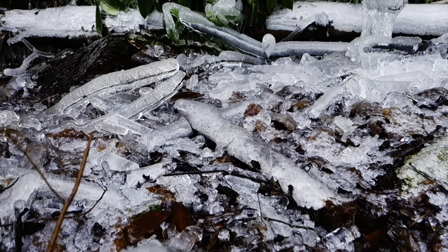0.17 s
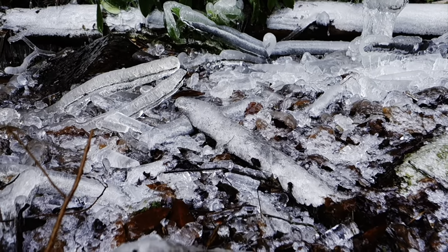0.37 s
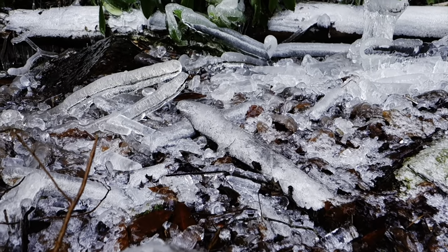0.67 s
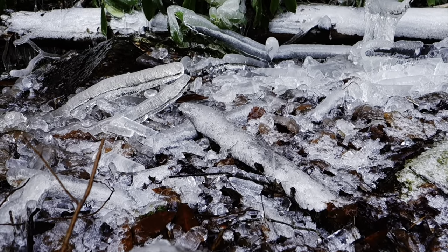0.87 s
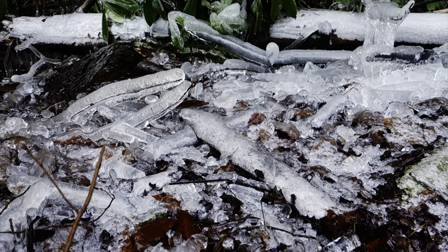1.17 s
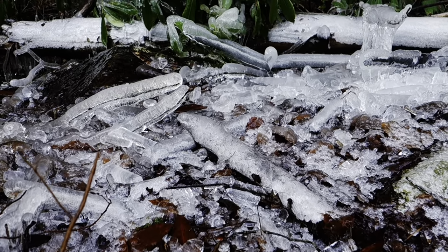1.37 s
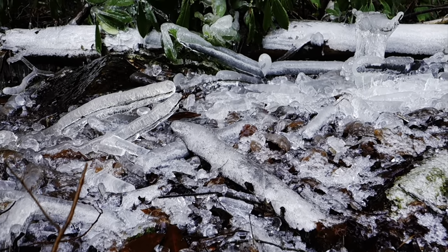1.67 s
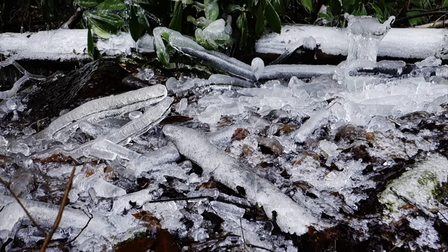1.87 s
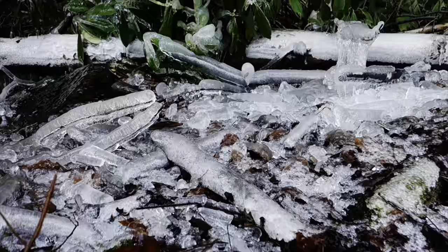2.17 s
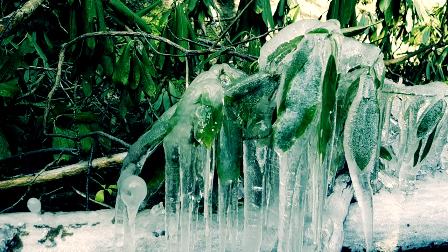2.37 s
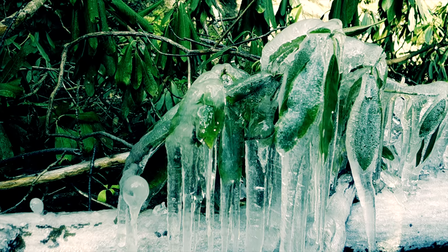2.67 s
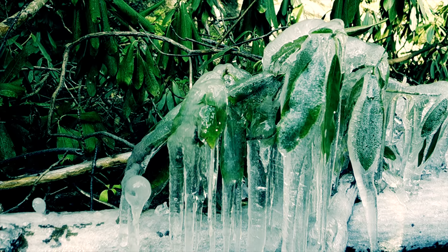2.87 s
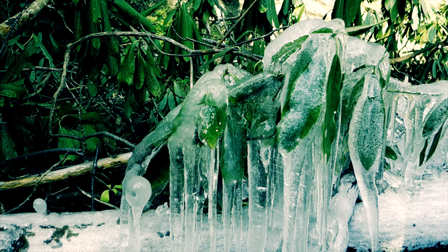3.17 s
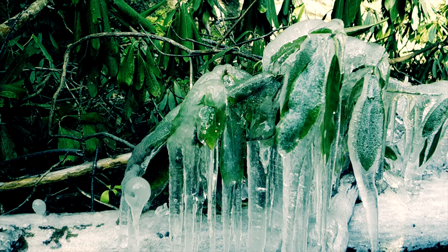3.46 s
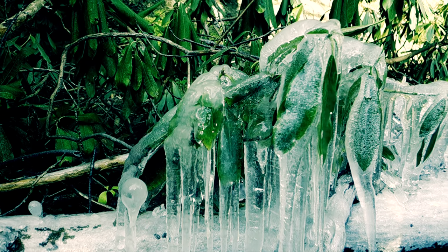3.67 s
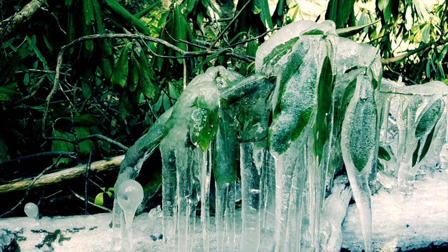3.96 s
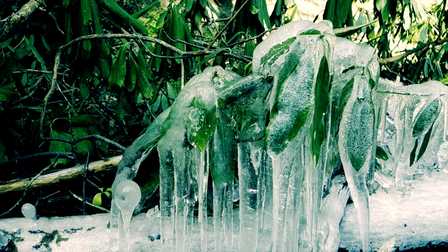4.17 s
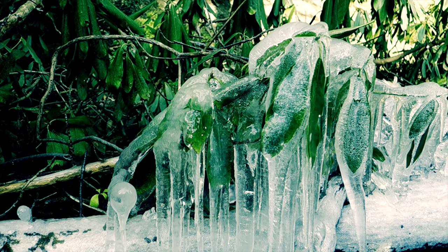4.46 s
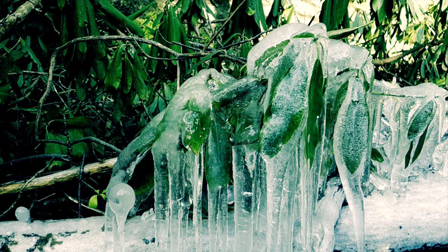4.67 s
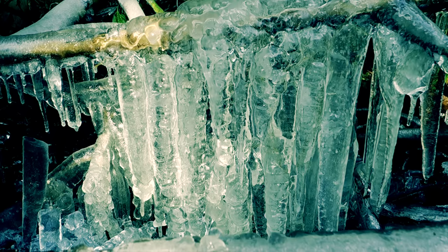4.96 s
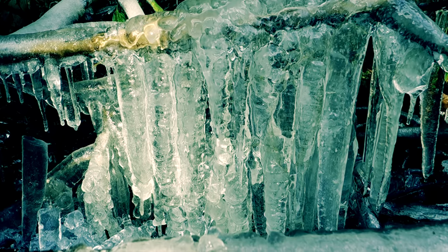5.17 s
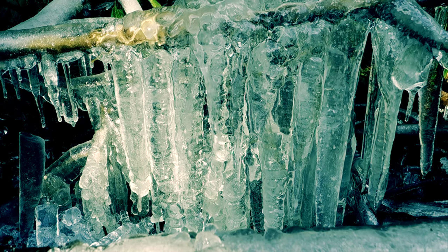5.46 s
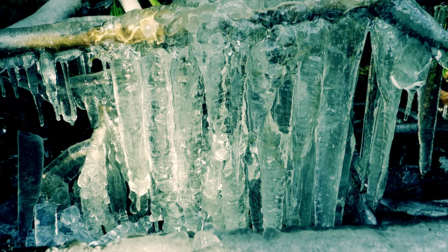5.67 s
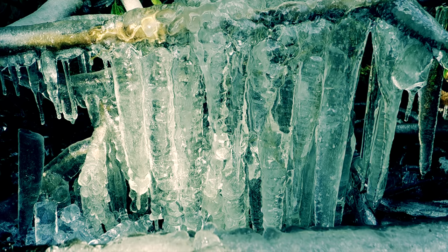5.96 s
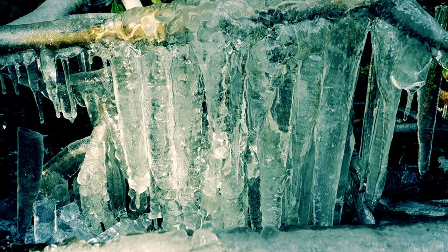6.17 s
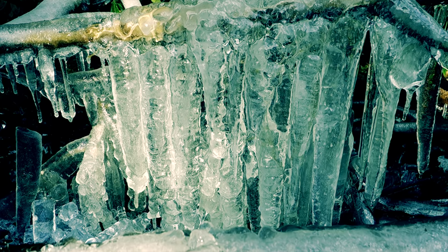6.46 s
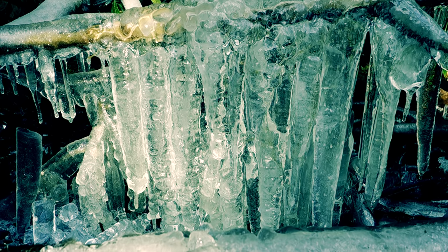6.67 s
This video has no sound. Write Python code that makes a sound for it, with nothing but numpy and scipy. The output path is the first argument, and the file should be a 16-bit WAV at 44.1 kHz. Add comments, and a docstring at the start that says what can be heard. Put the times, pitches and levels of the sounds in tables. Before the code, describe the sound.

Close, crisp water drops tick, plink and spatter at random outdoors, with a small stream rushing quietly behind and surging for about a second.

```python
"""Meltwater drips from icicles onto ice, wet rock and leaves beside a small stream.
Each near drop clicks, rings for a few cycles as damped sines and throws a spray that patters down just after it;
lighter drops fall at random and single bubbles chirp upwards.
Coloured noise and swarms of damped sines form farther drops and the rush of the stream,
which swells for just over a second near the end and then loses much of its low babble."""
import sys
import numpy as np
from scipy import signal
from scipy.fft import rfft, irfft, next_fast_len
from scipy.io import wavfile
from scipy.ndimage import uniform_filter1d, map_coordinates

SR = 44100
rng = np.random.default_rng(int(sys.argv[2]) if len(sys.argv) > 2 else 0)


def generate_wav(signal):
    """Clip the signal to [-1, 1] and save it as 16-bit WAV at the path in sys.argv[1]."""
    frames = np.transpose(np.atleast_2d(signal))
    scaled = np.clip(frames, -1, 1) * 32767
    pcm = np.round(scaled).astype(np.int16)
    wavfile.write(sys.argv[1], SR, pcm)


N = 301203  # length in samples

# Near drops. Each row: start in seconds, ring pitch in Hz, relative ring level in dB,
# relative click level in dB, relative spray level in dB, left over right in dB (ring and click).
DROPS = [(.0582, 8040, -36.5, -47, -63, 5), (.1587, 9080, -39.5, -46, -63, 3),
         (.2535, 6550, -50, -46, -58, 4), (.2657, 3260, -33, -41, -46, -4), (.2671, 2700, -36, -42, -40, 3),
         (.4168, 3150, -41, -35, -53, 2), (.4625, 9180, -43, -44, -50, 2), (.5233, 4530, -36, -39, -51, 1),
         (.528, 6000, -43, -52, -52, 2), (.554, 2200, -39.5, -50, -56, -2),
         (.8222, 4460, -40, -52, -60, -4), (.9073, 6030, -43, -36.5, -42, -1),
         (.9287, 3700, -46, -40, -56, -4), (.9562, 5500, -45, -38, -47, 2),
         (1.0007, 2520, -30, -47, -52, -3), (1.1803, 9100, -41, -37, -54, 4),
         (1.2013, 2550, -40, -48, -47, 0), (1.2228, 7700, -52, -36, -44, 2),
         (1.2497, 9600, -41, -36.5, -42, 4), (1.2618, 4570, -36, -34, -54, 1),
         (1.4174, 2550, -35, -34.5, -45, 1), (1.5173, 9350, -48, -41, -58, 7),
         (1.5238, 2960, -37, -52, -65, -4), (1.6395, 6550, -35, -47, -57, 0),
         (1.7175, 6200, -40, -35, -40.5, 5), (1.7441, 3300, -36, -37, -47, -4),
         (1.7462, 3500, -40, -31, -45, 2), (1.7798, 2700, -32, -33.5, -41, -1),
         (1.799, 2450, -36, -43, -59, -3), (1.8114, 2630, -33.5, -45, -58, -6),
         (1.853, 3930, -42, -52, -66, -5), (1.9278, 4150, -39, -30, -41, 1),
         (1.9531, 8760, -44, -41, -50, -2), (1.9749, 2040, -38, -36.5, -58, -1),
         (2.0119, 2370, -34, -42, -49, -3), (2.033, 4300, -44, -32.5, -56, 0),
         (2.0969, 2250, -32, -49, -50, -2), (2.1292, 3700, -48, -40, -65, -6),
         (2.3701, 8790, -42, -43, -59, 12), (2.3763, 3670, -44, -43, -65, -3),
         (2.4237, 9900, -36, -54, -61, 4), (2.4512, 2670, -41, -50, -58, -5),
         (2.4985, 3180, -43, -45, -54, -8), (2.5086, 2140, -38.5, -42, -41.5, -2),
         (2.7198, 3350, -36, -38, -47, -4), (2.7794, 4560, -35, -43, -41, -8),
         (2.8065, 3330, -42, -43, -56, 0), (2.8138, 2540, -40, -35, -45, -4),
         (2.8366, 2380, -36, -46, -50, -1), (3.0108, 3200, -32, -36, -54, 2),
         (3.0306, 2500, -37, -56, -54, -2), (3.044, 3970, -36, -42, -38, 0),
         (3.1003, 4840, -38, -44, -47, -13), (3.2404, 2420, -44, -54, -57, -6),
         (3.321, 3790, -40, -41, -54, -3), (3.3466, 9500, -36, -46, -42, 3),
         (3.378, 2870, -40, -37.5, -50, -4), (3.5221, 6660, -26.5, -29.5, -41, 1),
         (3.5474, 5700, -42, -37, -38, -4), (3.7105, 3970, -43, -39, -50, 0),
         (3.8377, 4240, -43, -39, -41, 4), (3.9723, 2650, -30.5, -31, -46, 2),
         (4.0008, 3770, -25, -33.5, -35.5, -9), (4.0507, 2480, -34.5, -46, -61, -6),
         (4.0962, 3300, -35.5, -43, -39, -3), (4.1585, 8900, -39, -40, -46, 3),
         (4.1996, 5900, -35, -38, -42, -1), (4.2306, 8100, -53, -35, -40, -3),
         (4.2965, 4590, -40, -50, -48, 0), (4.3932, 3000, -37, -35.5, -39, -2),
         (4.6325, 2660, -37, -55, -56, -7), (4.6983, 4990, -44, -51, -41, -9),
         (4.8081, 8750, -38, -38, -51, -2), (4.9525, 3760, -35.5, -45, -50, 0),
         (4.966, 2580, -36, -36, -46, -2), (5.057, 3480, -32, -37, -36, -1),
         (5.0665, 5540, -33, -48, -51, 0), (5.0964, 2940, -32, -48, -52, -5),
         (5.1549, 2200, -35, -44, -38, 4), (5.2099, 3280, -21, -29, -44, 0),
         (5.2114, 3400, -22, -30, -36, -4), (5.2266, 4870, -30, -31, -32, 1),
         (5.252, 2920, -38, -33, -42, 0), (5.2555, 2900, -33, -32, -49, 0),
         (5.262, 2500, -29.5, -41, -42, -1), (5.2675, 5830, -34, -41, -48, -6),
         (5.4415, 3380, -35, -44, -46, 2), (5.4482, 3170, -33, -44, -50, 1),
         (5.628, 7200, -34, -33.5, -40, 5), (5.9841, 4990, -36, -36, -46, 0),
         (6.0533, 2240, -27.5, -41, -47, 0), (6.0915, 4730, -34, -31, -39, -4),
         (6.266, 3980, -60, -35, -58, 0), (6.3862, 3200, -38, -53, -55, 2),
         (6.581, 2110, -39, -37.5, -50, 1), (6.6575, 3100, -46, -40, -60, -4),
         (6.7365, 4360, -43, -42, -54, 0)]
# Filter shapes of the stream's layers. Each row: frequency in Hz, relative gain in dB.
BABBLE_SPECTRUM = [(30, -60), (140, -30), (200, -20), (280, -9), (400, -2), (600, 1.5), (850, 2.5),
                   (1250, 6.5), (1800, -3), (4000, -54)]
RUSH_SPECTRUM = [(150, -71), (400, -15.5), (700, -9.5), (1100, -3.5), (1700, -1), (2500, 0), (3300, -1),
                 (4500, -3), (7000, -8), (11000, -11.5)]
PATTER_SPECTRUM = [(500, -54), (2000, -2), (3500, -5.5), (5000, -2.5), (7500, -1), (11000, 1.5)]
# Coherence of the stream noise. Each row: frequency in Hz, left-right correlation (1 is identical).
COHERENCE = [(100, 0.95), (300, 0.92), (600, 1), (1200, 0.9), (2500, 0.94), (5000, 0.032), (11000, 0.43)]
# Echo of the rocky bank. Each row: frequency in Hz, time to decay by 60 dB in seconds.
BANK_DECAY = [(300, 0.2), (2500, 0.12), (10000, 0.039)]
# Modes of a wet hollow. Each row: multiple of its pitch, relative level in dB, share of the ring's life.
HOLLOW_MODES = [(1, 17, 0.55), (.68, -2, 1), (1.4, -10, 0.48), (1.95, -10, 0.93)]
# Far patter before swell and random drift. Each row: time in seconds, level in dB.
PATTER_LEVEL = [(0, -42), (1.05, -44.5), (1.7, -41), (2.3, -42), (2.95, -44.5), (3.9, -41.5), (4.35, -39),
                (4.8, -42.5), (5.7, -41.5), (6.83, -43)]
# Low babble before swell, final fade and random surges. Each row: time in seconds, level in dB.
BABBLE_LEVEL = [(0, -56), (.6, -54.5), (1.1, -57), (2.2, -55), (2.6, -52.5), (3.2, -56), (3.75, -55.5),
                (4.4, -53.5), (6.83, -55.5)]
# Single bubbles. Each row: start in seconds, level in dB, starting pitch in Hz,
# time to the peak in seconds, climb of the pitch in Hz per second.
BUBBLES = [(.059, -40, 2130, .002, 20000), (.595, -50, 560, 0.0063, 2800), (.635, -38, 2600, 0.0017, 20000),
           (.861, -42, 2370, .002, 20000), (.989, -37.5, 1620, 0.0039, 15000),
           (1.0961, -28, 1100, 0.0011, 280000), (1.283, -43, 1037, 0.01, 6000),
           (1.47, -39, 2460, .002, 20000), (1.541, -39, 2020, .002, 20000),
           (1.5904, -26, 890, 0.0018, 380000), (1.956, -44, 1330, .002, 15000),
           (2.116, -41, 2270, .003, 15000), (2.529, -39, 2350, 0.0018, 20000),
           (2.731, -41.5, 1690, 0.0054, 7000), (2.851, -40, 2030, 0.0022, 20000),
           (3.531, -38, 2060, .001, 50000), (3.729, -51, 323, 0.0033, 1600),
           (3.936, -40.5, 1340, 0.0025, 12000), (4.1715, -39, 740, 0.0024, 35000),
           (5.68, -38, 2360, .003, 15000), (6.052, -46, 250, 0.0018, 70000),
           (6.261, -37, 1650, 0.0036, 12000), (6.518, -42, 1810, 0.0022, 15000),
           (6.59, -38, 2640, 0.0022, 20000)]

TOP_HZ = 11090  # upper band limit
RING_CYCLES = 3  # decay of a drop's ring to 1/e, before the time to flatten is added
HARD_CLICK_DB = -28.5  # a click this loud snaps fully
# lighter drops: typical values on the scales of DROPS, and their scatter
LIGHT_HZ, LIGHT_OCTAVES = 2850, 0.31
LIGHT_RING_DB, LIGHT_CLICK_DB, LIGHT_SPRAY_DB = -56, -48.5, -59
LIGHT_SPREAD_DB, LIGHT_PAN_DB = 3.5, 4
# the swell of the stream rises, holds and falls back
SWELL_START_S, SWELL_RISE_S = 4.87, 0.094
SWELL_END_S, SWELL_FALL_S = 6.175, 0.055
BABBLE_FADE_S = 0.12  # the low babble dies away more slowly than the rush
# changes of level during the swell and after it, and the level of the rush before it
BABBLE_SWELL_DB, BABBLE_AFTER_DB = 2, -12.5
RUSH_DB, RUSH_SWELL_DB, RUSH_AFTER_DB = -46.5, 8, 2.5
PATTER_SWELL_DB = 6.5


def amp(db):
    """Level: decibels to an amplitude ratio."""
    return 10 ** (np.asarray(db) / 20)


def unit(x):
    """Normalisation: scale to rms 1."""
    return x / np.sqrt(np.mean(x ** 2) + 1e-20)


def along(points, hz):
    """Interpolation: (Hz, value) points read on a logarithmic frequency axis."""
    f, value = np.transpose(points)
    return np.interp(np.log(hz + 1), np.log(f + 1), value)


def curve(points):
    """Interpolation: (seconds, value) points read at every sample."""
    s, value = np.transpose(points)
    return np.interp(np.arange(N) / SR, s, value)


def ramp(start_s, length_s):
    """Linear transition from 0 to 1 over length_s."""
    return np.clip((np.arange(N) / SR - start_s) / length_s, 0, 1)


def wobble(rate):
    """Slow random fluctuation: a smooth curve through rate random knots a second."""
    knots = rng.standard_normal(int(N * rate / SR) + 4)
    return map_coordinates(knots, [np.arange(N) * rate / SR])


def filtered(x, response):
    """Linear filtering: the spectrum of x times a response of frequency."""
    m = next_fast_len(N + SR // 2)
    return irfft(rfft(x, m) * response(np.fft.rfftfreq(m, 1 / SR)), m)[..., :N]


def coloured(x, spectrum):
    """Spectral shaping: x through a gain curve, rms 1."""
    return unit(filtered(x, lambda hz: amp(along(spectrum, hz))))


def add(track, s, sound):
    """Superposition: mix a stereo sound into the track at time s."""
    part = track[:, max(round(s * SR), 0):][:, :sound.shape[1]]
    part += sound[:, :part.shape[1]]


def noise(patchy_db):
    """Turbulence: white noise with patches of random gain, partly coherent between the two sides."""
    z = signal.stft(rng.standard_normal((2, N)), nperseg=256)[2]
    field = rng.standard_normal(z.shape[1:])
    field = uniform_filter1d(field, size=5, axis=0)  # across frequency
    field = uniform_filter1d(field, size=9, axis=1)  # across time
    pair = signal.istft(z * amp(patchy_db * unit(field)), nperseg=256)[1][:, :N]

    def mid_side_gains(hz):
        angle = np.arccos(np.clip(along(COHERENCE, hz), -1, 1)) / 2
        return np.array([np.cos(angle), np.sin(angle)])

    mid, side = filtered(pair, mid_side_gains)
    return unit(np.array([mid + side, mid - side]))


def grains(s, hz, gain, cycles, lag_ms, glide, size):
    """Damped oscillation: one decaying sine per droplet or bubble, each with its own lag and level by side."""
    hz = np.clip(hz, 100, TOP_HZ)[:, None]
    lag, pan = rng.standard_normal((len(s), 2)).T
    index = (s * SR).astype(int)[:, None] + np.arange(size)
    sides = []
    for sign in (1, -1):
        delay = lag_ms / 1000 * (2 + sign * lag[:, None] / 2)
        turns = hz * np.maximum(np.arange(size) / SR - delay, 0)
        age = turns / cycles
        envelope = np.exp(-age) * (1 - np.exp(-2 * turns))
        wave = np.sin(2 * np.pi * turns * (1 + glide * age)) * envelope
        level = (gain * amp(sign * 3.34 * pan))[:, None]
        sides.append(np.bincount(index.ravel(), (wave * level).ravel(), N)[:N])
    return np.array(sides)


def swarm(centre_hz, octaves, spread_db, cycles, lag_ms, glide, count, size):
    """Random superposition: grains at random times, pitches and strengths, rms 1."""
    when = rng.random(count)
    pitch, strength = rng.standard_normal((count, 2)).T
    hz = centre_hz * 2 ** (octaves * pitch)
    gain = amp(spread_db * np.minimum(strength, 2)) * (hz < TOP_HZ) * np.sqrt(hz)
    return unit(grains(when * N / SR, hz, gain, cycles, lag_ms, glide, size))


def flow(surge_db=1.66, ripple_db=0.2, drift_db=0.83):
    """Flow strength: levels in dB of babble, rush and patter; one swell lifts all three and each wanders."""
    over = ramp(SWELL_END_S, SWELL_FALL_S)
    swell = ramp(SWELL_START_S, SWELL_RISE_S) - over
    babble = curve(BABBLE_LEVEL) + BABBLE_SWELL_DB * swell
    babble += BABBLE_AFTER_DB * ramp(SWELL_END_S, BABBLE_FADE_S)
    rush = RUSH_DB + RUSH_SWELL_DB * swell + RUSH_AFTER_DB * over
    patter = curve(PATTER_LEVEL) + PATTER_SWELL_DB * swell
    return babble + surge_db * wobble(6.9), rush + ripple_db * wobble(18), patter + drift_db * wobble(10.0)


def stream(flutter_db=2.5):
    """Bubble resonance and turbulence: rising-pitched bubbles in a noisy rush, under the patter of far drops."""
    babble_db, rush_db, patter_db = flow()
    big = swarm(centre_hz=652.8, octaves=0.63, spread_db=1, cycles=8.8, lag_ms=0.12,
                glide=0.013, count=1200, size=2000)
    small = swarm(centre_hz=2013.0, octaves=0.6994, spread_db=1.5, cycles=10.8, lag_ms=0.084,
                  glide=0.018, count=4500, size=1000)
    plinks = swarm(centre_hz=3740, octaves=0.49, spread_db=1.5, cycles=9.5, lag_ms=0.06,
                   glide=0.01, count=500, size=1500)
    ticks = swarm(centre_hz=5980, octaves=0.86, spread_db=8, cycles=0.97, lag_ms=0.041,
                  glide=0, count=5000, size=120)
    babble = coloured(noise(patchy_db=0.1) + amp(-13.5) * big, BABBLE_SPECTRUM)
    babble = babble * amp([[1], [-1]])  # 1 dB up on the left, 1 dB down on the right
    rush = coloured(noise(patchy_db=0.8) + amp(-10) * small, RUSH_SPECTRUM)
    rush = unit(rush + amp(-10.5) * plinks)
    patter = coloured(noise(patchy_db=2.5) + amp(-10.0) * ticks, PATTER_SPECTRUM)
    # far drops come in flurries, unlike on the two sides
    flurries = flutter_db * np.array([wobble(22), wobble(22)])
    return amp(babble_db) * babble + amp(rush_db) * rush + amp(patter_db + flurries) * patter


def bank(x):
    """Diffuse reflection: rock, ice and leaves scatter a short echo, modelled as decaying noise."""
    hz, t, z = signal.stft(rng.standard_normal((2, SR // 3)), SR, nperseg=256)
    decay = amp(-60 * t / along(BANK_DECAY, hz)[:, None])
    tail = signal.istft(z * decay, SR, nperseg=256)[1]
    return signal.fftconvolve(x, tail / np.linalg.norm(tail[0]), axes=1)[:, :N]


def bubbles():
    """Bubble chirp: sines swell and fade as their pitch climbs; brief steep ones plop, slow ones gurgle."""
    out, t = np.zeros((2, N)), np.arange(SR // 10) / SR
    for s, db, hz, peak_s, climb in BUBBLES:
        envelope = (t / peak_s * np.exp(1 - t / peak_s)) ** 2
        wave = np.sin(2 * np.pi * t * (hz + climb * t / 2)) * envelope
        # each bubble is kept free of sound far below its pitch
        wave = signal.lfilter(*signal.butter(2, hz / 3, "high", fs=SR), wave)
        add(out, s, amp(db) * np.array([wave, wave]))
    return out


def spray(drops, spray_db=3, flight=.015, centre_hz=6100, octaves=0.702, spread_db=5, follow=0.23, count=60):
    """Splashing: every impact throws tiny droplets that land over the next few hundredths of a second."""
    s, ring_hz, _, _, level, _ = np.repeat(drops, count, axis=0).T
    # two exponential waits, each of mean length flight in seconds
    delay = -flight * np.log(rng.random((len(s), 2))).sum(axis=1)
    pitch, strength = rng.standard_normal((len(s), 2)).T
    # big, low-ringing drops throw bigger droplets, which sound lower
    centre = centre_hz * (ring_hz / np.median(ring_hz)) ** follow
    hz = centre * 2 ** (octaves * np.maximum(pitch, -2 + abs(strength) / 2))
    gain = amp(level + spray_db + spread_db * np.minimum(strength, 1.5)) * (hz < TOP_HZ)
    droplets = grains(s + delay, hz, gain, cycles=1.8, lag_ms=0.027, glide=0, size=160)
    return signal.lfilter(*signal.butter(2, 900, "high", fs=SR), droplets)  # too small to radiate bass


def light_drops(count=110):
    """Random arrivals: rows like those of DROPS, one lighter drop at a random moment of each equal time slot."""
    when = (np.arange(count) + rng.random(count)) / count * N / SR
    pitch, ring, click, splash, pan = np.clip(rng.standard_normal((count, 5)), -1.5, 1.5).T
    return np.column_stack([when,
                            LIGHT_HZ * 2 ** (LIGHT_OCTAVES * pitch),
                            LIGHT_RING_DB + LIGHT_SPREAD_DB * ring,
                            LIGHT_CLICK_DB + LIGHT_SPREAD_DB * click,
                            LIGHT_SPRAY_DB + LIGHT_SPREAD_DB * splash,
                            LIGHT_PAN_DB * pan])


def burst(wave, low_hz, order):
    """Energy scaling: a short wave without its bass, given the energy of 3 ms at rms 1."""
    wave = signal.lfilter(*signal.butter(order, low_hz, "high", fs=SR), wave)
    return wave / np.sqrt(np.sum(wave ** 2, axis=-1, keepdims=True) / (.003 * SR))


def hollow_ring(hz, u, attack, detune):
    """Modal resonance: the wet hollow that a drop hits rings as a few damped sines."""
    # the drop takes a moment to flatten, which draws out even the briefest ring
    life = RING_CYCLES / hz + 0.00029
    tone = 0
    for ratio, db, share in HOLLOW_MODES:
        # no two hollows have the same shape, so their side modes differ
        mode_hz = hz * ratio * (1 + detune * rng.normal() * (ratio != 1))
        mode = np.sin(2 * np.pi * (mode_hz * u + rng.random()))
        tone = tone + amp(db) * mode * np.exp(-u / (life * share))
    return burst(tone * (1 - np.exp(-u / attack)), hz / 3, order=3)


def drips(drops, ring_db=-1.5, snap_db=-1, snap_hz=5200, snap_life=.00008, crackle_db=2.0,
          crackle_life=0.00055, attack=0.00028, detune=0.06, low_db=-19, scatter_db=-10, scatter_life=0.0012):
    """Impact: a hard snap, a crackle as the drop bursts and a ring; lives and attack in seconds."""
    out, t = np.zeros((2, N)), np.arange(SR // 40) / SR
    for s, hz, ring, click, _, pan in drops:
        # one side hears the drop first
        side_lag = np.array([[1], [-1]]) * rng.normal(0, .00002)
        u = np.maximum(t - side_lag - .0001, 0)
        tone = hollow_ring(hz, u, attack, detune)
        # fast drops snap hard and burst at once; slow ones snap less and crackle longer
        hardness = amp(min(click - HARD_CLICK_DB, 0))
        snap = np.sin(2 * np.pi * snap_hz * u) * np.exp(-u / snap_life)
        snap = hardness * burst(snap, 1200, order=2)
        crackle_shape = np.sqrt(t) * np.exp(-t * np.sqrt(hardness) / crackle_life)
        crackle = burst(rng.standard_normal((2, len(t))) * crackle_shape, 3600, order=2)
        low_part = (1 - t / .0005) * np.exp(-t / .0005)  # faint and lower than the snap
        contact = amp(snap_db) * snap + amp(crackle_db) * crackle + amp(low_db) * low_part
        wave = amp(ring + ring_db) * tone + amp(click) * contact
        wave = wave * amp([[pan / 2], [-pan / 2]])
        add(out, s, wave)
        # the rough ice close by scatters it
        ice = rng.standard_normal((2, len(t))) * t * np.exp(-t / scatter_life)
        add(out, s, amp(scatter_db) * signal.fftconvolve(wave, ice / np.linalg.norm(ice[0]), axes=1))
    return out


def scene(echo_db=-10, spray_echo_db=-4, lag_ms=0.036):
    """Superposition: drops and their echo over the stream; an earlier right side sets the water to the right."""
    drops = np.vstack([DROPS, light_drops()])
    hits = drips(drops) + bubbles()
    splashes = spray(drops)
    echo = bank(amp(echo_db) * hits + amp(spray_echo_db) * splashes)
    water = hits + splashes + echo + stream()
    half_turns = np.array([[-1], [1]]) * np.pi * lag_ms / 1000  # phase per Hz: left later, right earlier
    return filtered(water, lambda hz: np.exp(1j * hz * half_turns))


def record(dry):
    """Band limiting: a very steep low-pass at TOP_HZ."""
    return filtered(dry, lambda hz: 1 / np.sqrt(1 + (hz / TOP_HZ) ** 300))


dry = scene()
out = record(dry)
generate_wav(out)
```